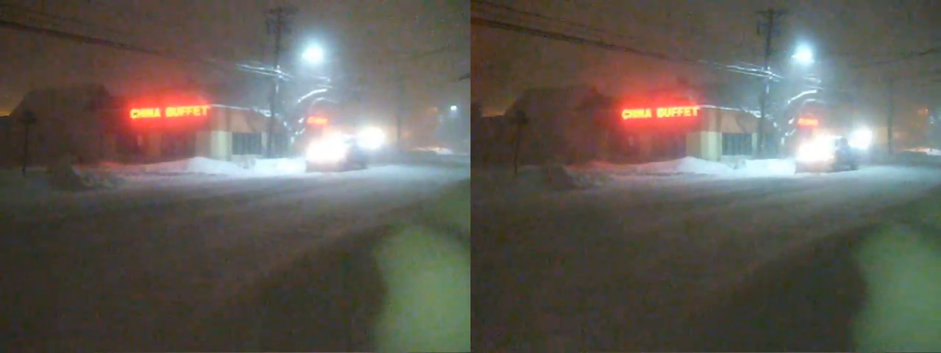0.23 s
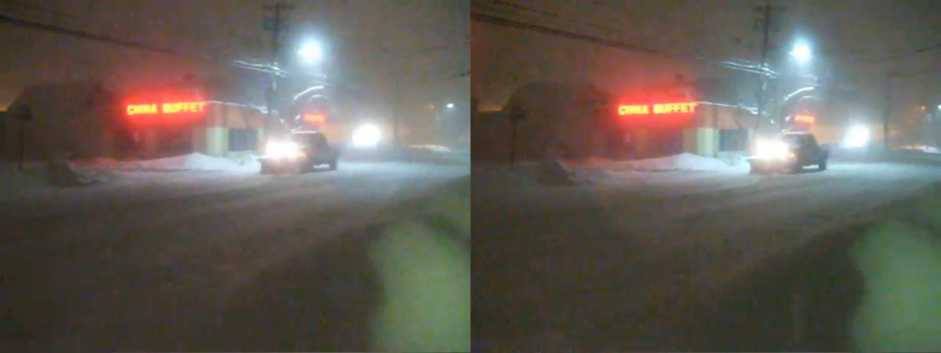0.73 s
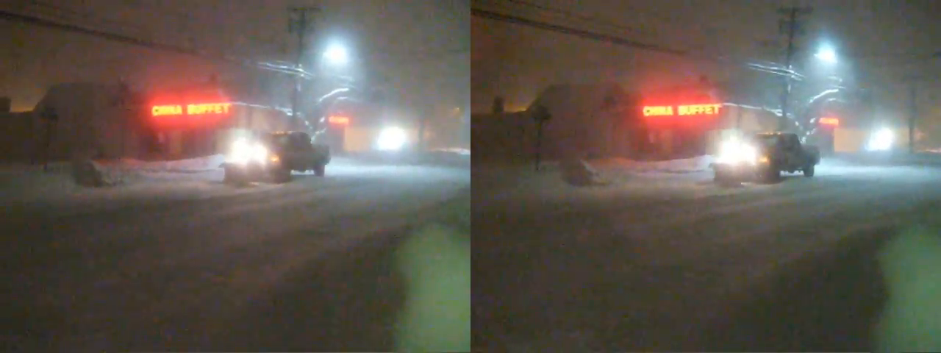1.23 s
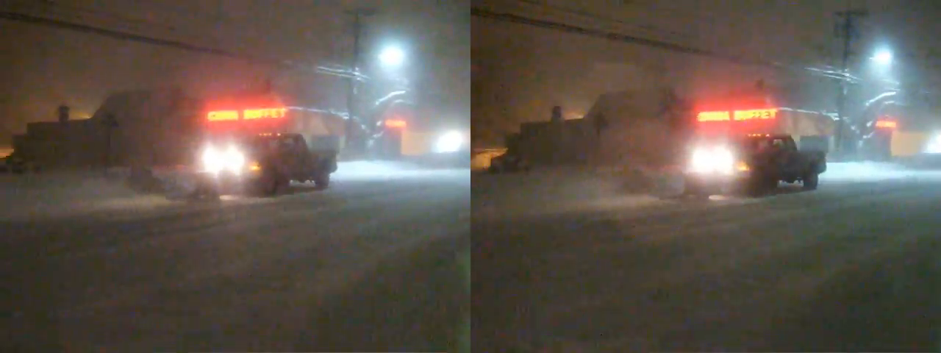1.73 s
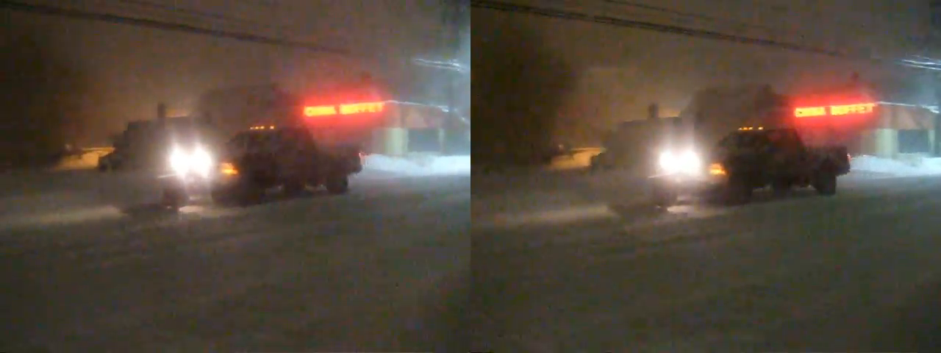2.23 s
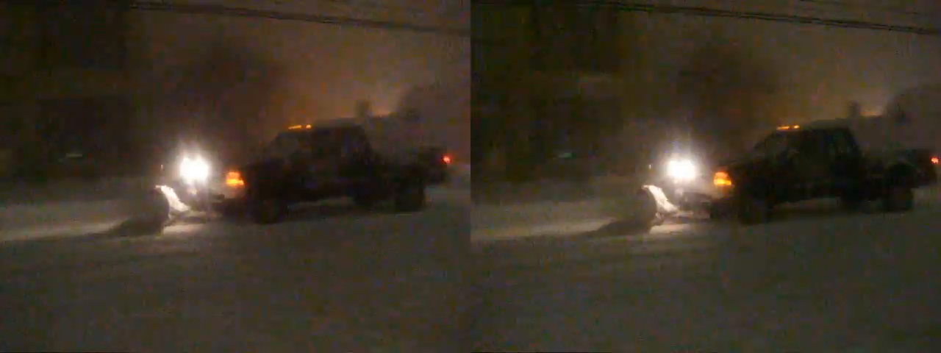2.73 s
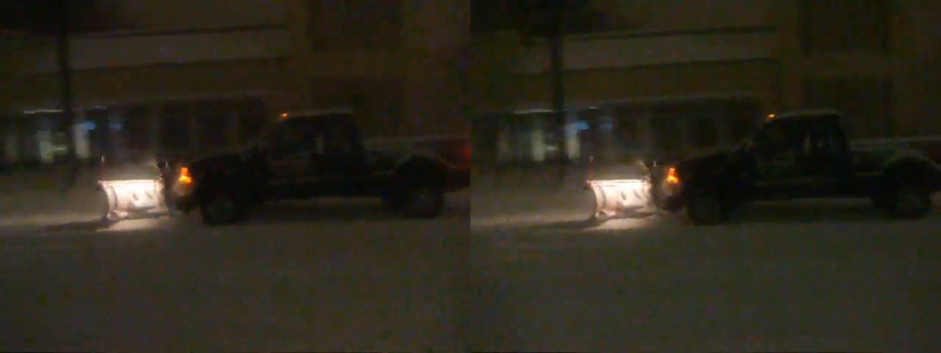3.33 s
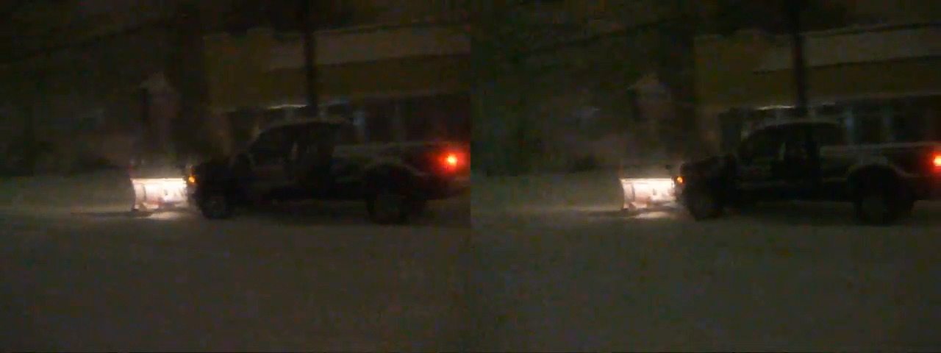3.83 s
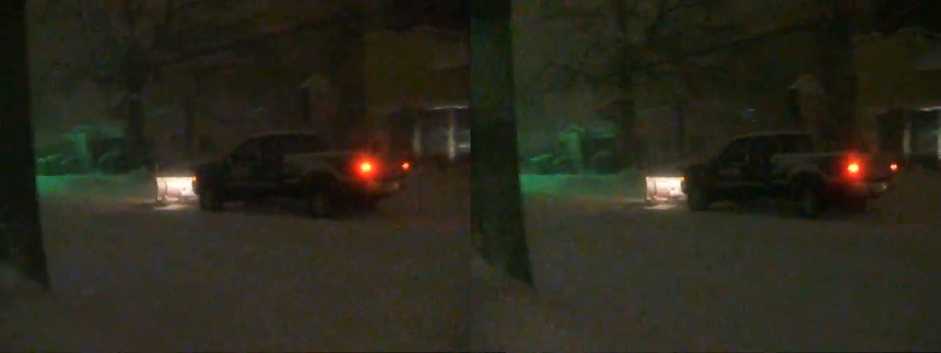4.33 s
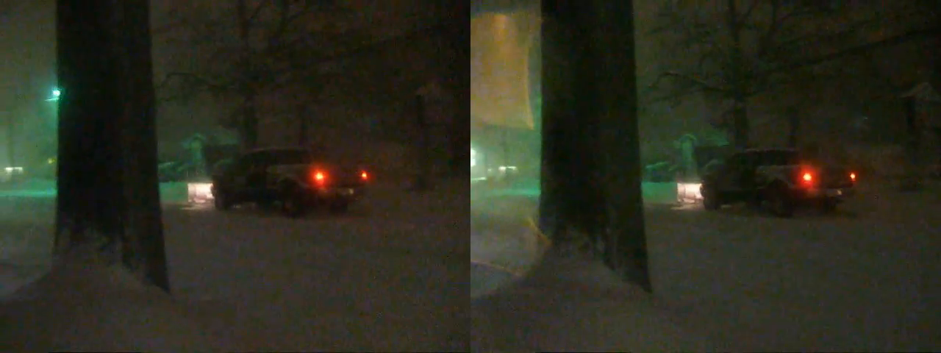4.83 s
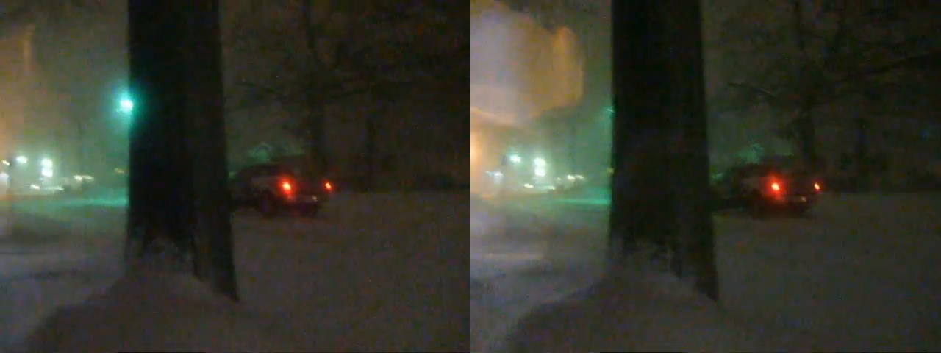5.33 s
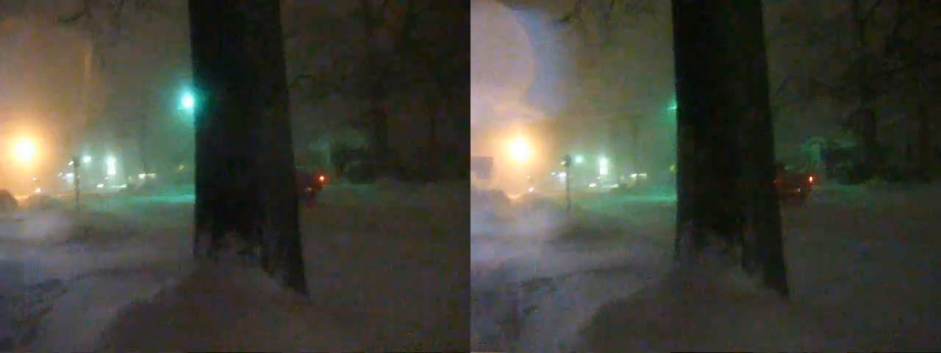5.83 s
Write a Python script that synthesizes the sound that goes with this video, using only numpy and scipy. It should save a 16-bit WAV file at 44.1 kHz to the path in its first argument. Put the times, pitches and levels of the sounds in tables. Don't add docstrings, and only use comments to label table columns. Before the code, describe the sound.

A handheld camera's two microphone ports catch soft storm hiss and sparse pellet ticks, then a passing truck's droning hum and broad rushing roar. Scattered wind slaps hit left and right separately, easing briefly near the pass; afterwards dense, loud, ragged gusts flap and crackle over the departing vehicle before dropping away at the end.

```python
import sys
import numpy as np
from scipy import signal
from scipy.io import wavfile
from scipy.ndimage import uniform_filter1d

SR = 44100
rng = np.random.default_rng(int(sys.argv[2]) if len(sys.argv) > 2 else 0)


def store_pcm(level_fs):
    pcm = np.round(np.clip(level_fs, -1, 1) * 32767).astype(np.int16)
    wavfile.write(sys.argv[1], SR, np.atleast_2d(pcm).T)


def elevation(decibels):
    levels = np.asarray(decibels, float)
    return 10 ** (levels / 20)


N = 267598


def evened(x):
    return x / np.sqrt(np.mean(x ** 2) + 1e-20)


def read(points, hz):
    point_hz, value = np.transpose(points)
    return np.interp(np.log(hz + 1), np.log(point_hz + 1), value)


def curves(rows, t):
    s, *columns = np.transpose(rows)
    return [np.interp(t, s, column) for column in columns]


def add(mix, s, sound):
    part = mix[..., round(s * SR):][..., :sound.shape[-1]]
    part += sound[..., :part.shape[-1]]


def wander(smooth_s):
    size = int(smooth_s * SR)
    once = uniform_filter1d(rng.standard_normal(N), size=size)
    return evened(uniform_filter1d(once, size=size))


def hiss(field_db, same, patchy_db):
    frames = field_db.shape[1]
    a, b, c, d, patches = rng.standard_normal((frames, 513, 5)).T
    patches = uniform_filter1d(patches, size=8, axis=0)
    patches = evened(uniform_filter1d(patches, size=12, axis=1))
    same = np.clip(same, -1, 1)
    left = a + 1j * b
    right = same * left + np.sqrt(1 - same ** 2) * (c + 1j * d)
    spectra = np.array([left, right]) * elevation(field_db + patchy_db * patches)
    return signal.istft(spectra, nperseg=1024, noverlap=768)[1][:, :N]


# pitch_hz [Hz], level_db [dB per Hz]
STREET_SPECTRUM = [(310, -31), (1450, 5.5), (3100, 2), (6100, -7), (10900, -25), (13600, -57)]


def street():
    hz = np.fft.rfftfreq(1024, 1 / SR)
    t = np.arange(N // 256 + 5) * 256 / SR
    rise_db_per_s = 1.6
    field_db = read(STREET_SPECTRUM, hz)[:, None] + rise_db_per_s * t
    return elevation(-45.5) * evened(hiss(field_db, same=0.11, patchy_db=-0.5))


# [dB, left minus right]
PELLETS = [(0.0485, -46, 8250, 0.0046, -16), (0.3187, -49, 7000, 0.011, 19),
           (0.5176, -42, 7520, 0.0057, -1), (0.6412, -42, 10700, 0.0084, 14),
           (1.063, -40.5, 7320, 0.021, 8), (1.1722, -43, 8350, 0.0061, 10), (1.2984, -39, 8410, 0.0056, 13),
           (1.39, -39.5, 7590, 0.0038, 18), (1.5314, -38, 7720, 0.0071, -1.0),
           (1.5628, -35, 7780, 0.044, -14.5), (1.6162, -45, 7280, 0.0048, 24),
           (1.7424, -41, 9500, 0.012, 13), (1.8166, -42, 7400, 0.0031, 22), (1.923, -39, 8350, 0.007, -14),
           (4.7054, -40, 7120, 0.007, 0.0), (4.7154, -46.5, 7170, 0.0081, 1.0),
           (5.2534, -46, 13300, 0.007, -3), (5.3844, -54, 13500, 0.007, 7),
           (5.5224, -56.5, 12000, 0.007, -2), (4.148, -55, 13000, 0.012, -1),
           (4.955, -53, 13000, 0.012, -5)]


def pellets():
    out, t = np.zeros((2, N)), np.arange(600) / SR
    band = signal.butter(2, [6000, 14000], "band", fs=SR)
    cracks = signal.lfilter(*band, rng.standard_normal((len(PELLETS), 600)))
    for (s, peak_db, hz, t60_s, pan_db), crack in zip(PELLETS, cracks):
        onset = 1 - np.exp(-t / 0.00022)
        ring = np.sin(2 * np.pi * hz * t) * elevation(-60 * t / t60_s) * onset
        tick = ring + 3.46 * crack * elevation(-60 * t / 0.003)
        pan = elevation(np.array([[pan_db], [-pan_db]]) / 2)
        add(out, s, elevation(peak_db) * pan * tick)
    return out


# peak_s [s], left_db [dB], right_db [dB], length_s [s]
GUSTS = [(0.895, 5.5, 5, 0.061), (1.344, 6.5, 9, 0.085), (1.43, 4, 4, 0.046), (1.6, 8.5, 7, 0.095),
         (2.056, 1.5, -2, 0.16), (3.19, 2, 1, 0.064), (3.582, 3.5, 4, 0.11), (3.712, -3, 9, 0.14),
         (4.103, 7, 9, 0.13), (4.482, 8, -3, 0.039), (4.878, 8, 4, 0.12), (5.038, 1, 4.5, 0.069),
         (5.22, 1.5, 2, 0.098), (5.378, 7.5, 1.5, 0.094), (5.552, 7.5, 4.5, 0.067)]


def gust_db():
    t, out = np.arange(N) / SR, np.zeros((2, N))
    for s, left_db, right_db, length_s in GUSTS:
        width_s = length_s * np.where(t < s, 0.51, 1)
        bell = np.exp(-2 * ((t - s) / width_s) ** 2)
        out += np.array([[left_db], [right_db]]) * bell
    return out


def eddy(half_ms):
    u = np.arange(-5 * half_ms, 5 * half_ms, 1000 / SR) / half_ms
    return (u ** 2 - 1) * np.exp(-u ** 2 / 2)


def eddies(level_db, small_ms, large_ms, per_s, clump_db, onset_db):
    out, clumps = np.zeros(N), elevation(clump_db * wander(0.015))
    for half_ms in np.geomspace(small_ms, large_ms, num=6):
        when, size, sign = rng.random((N, 3)).T
        strength = np.clip(size, .03, 1) ** -.35
        train = (when < per_s / SR) * strength * np.sign(sign - .4)
        out += half_ms ** -.1 * signal.oaconvolve(train * clumps, eddy(half_ms), "same")
    slow_rms = np.sqrt(uniform_filter1d(out ** 2, size=7000) + .2 * np.mean(out ** 2))
    alive = np.clip((level_db - onset_db) / 8 + .6, 0, 1)
    return out / slow_rms * elevation(level_db) * alive


# [dB, small eddies re large]
WIND = [(0, -35.5, 2, -7.5), (.35, -43.5, -2.5, -3.5), (.7, -40.5, -1, -12), (1.25, -39, 7.5, -8),
        (1.45, -33.5, 2, -9), (1.9, -34.5, -1.5, -5.5), (2.3, -34, 6.5, -12.5), (2.55, -30.5, 8, -9.5),
        (2.9, -42.5, -3.5, 9), (3.3, -38.5, 0.5, 13), (3.8, -32.5, 2.5, 2.5), (4.0, -23, -3.5, -6),
        (4.4, -20.5, -1.5, -8.5), (4.75, -24, 1, -4.5), (5.12, -20, 8.5, -3), (5.6, -23.5, -8.5, -4.5),
        (5.7, -32, 2.5, -6.5), (6.07, -38.5, -1, -1.5)]
# start_s [s], peak_db [dB], half_width_ms [ms], way [1 dip, -1 push]
SLAPS_LEFT = [(1.3138, -10, 1.03, 1), (1.3255, -16.8, 2.47, 1), (1.3485, -4.5, 2.6, 1),
              (1.4131, -19, 2.4, 1), (1.4339, -19.4, 4.5, -1), (1.5271, -18, 2.2, -1),
              (1.605, -17, 2.6, -1), (1.6181, -14, 2.8, -1), (2.025, -14, 3.2, -1), (2.0452, -17, 3.5, -1),
              (2.0559, -16, 2.9, -1), (2.0889, -15.9, 3.2, -1), (2.1049, -14, 3.02, 1),
              (2.1648, -20, 1.8, 1), (3.2217, -12.5, 2.1, -1), (3.5852, -9.5, 1.66, -1),
              (3.5989, -18, 1.1, 1), (3.6965, -7.5, 2.02, -1), (3.8314, -9.5, 1.5, 1),
              (4.0362, -8.5, 1.36, 1), (4.1107, -2.5, 1.18, 1), (4.1426, -3, 2.1, 1), (4.1723, -10, 1.5, 1),
              (4.4562, -7, 3.69, -1), (4.522, -11.0, 2.3, -1), (4.5792, -6.5, 1.86, 1),
              (4.8431, -9, 2.4, -1), (4.855, -3, 3.3, 1), (4.8699, -3, 1.75, 1), (4.8872, 0.5, 0.88, -1),
              (4.9034, -1.5, 3.69, -1), (4.9178, -7, 3.69, -1), (4.9512, -1, 2.06, -1),
              (4.9617, -6, 2.47, -1), (5.0329, -5, 1.9, -1), (5.0607, -9.6, 2.47, 1),
              (5.0937, -11, 3.69, -1), (5.1257, -17, 3.02, 1), (5.1454, -11, 2.47, -1),
              (5.1559, -4, 2.02, 1), (5.1649, -14.5, 5.5, -1), (5.1933, -7.5, 1.7, 1),
              (5.2157, -7, 2.8, -1), (5.2438, -7, 2.47, 1), (5.2533, -3, 1.63, 1), (5.2679, -1, 1.02, 1),
              (5.2847, -8, 1.8, -1), (5.299, -6, 3.5, 1), (5.3555, -2.5, 3.8, 1), (5.5597, -7, 1.95, 1)]
# start_s [s], peak_db [dB], half_width_ms [ms], way [1 dip, -1 push]
SLAPS_RIGHT = [(1.3447, -10, 2.3, 1), (1.5603, -18.1, 1.5, -1), (1.5731, -17.6, 1.8, -1),
               (1.6065, -16.5, 3.02, -1), (1.6449, -13.0, 2.6, 1), (1.7944, -26, 3.02, -1),
               (2.0198, -16, 3.3, 1), (2.0335, -19.6, 5.2, -1), (3.2047, -6.5, 1.2, 1),
               (3.2862, -12.5, 0.93, 1), (3.586, -9.1, 1.66, -1), (3.6038, -5.5, 1.13, 1),
               (3.6692, -9, 0.53, 1), (3.7235, -10, 1.9, 1), (3.7361, -14, 1.3, 1),
               (3.7542, -4.5, 1.53, -1), (4.0244, -9, 1.3, 1), (4.0347, -6.5, 1.36, 1),
               (4.0796, -11, 1.5, -1), (4.0882, -8, 0.99, 1), (4.098, -7, 1.1, 1), (4.1113, -11.3, 3.7, -1),
               (4.231, -10.6, 1.47, 1), (4.2416, -2, 2.9, -1), (4.3548, -6, 2, 1), (4.4831, -14, 2.4, 1),
               (4.508, -14.5, 3, -1), (4.5276, -11, 2.2, 1), (4.676, -11, 2.3, 1), (4.713, -15, 4.7, -1),
               (4.7427, -9, 2.3, -1), (4.7724, -6, 1.4, 1), (4.8378, -3.5, 1.5, 1), (4.8465, -13, 3.5, 1),
               (4.8935, -7, 3.1, -1), (4.9484, -6, 4.8, -1), (5.0155, -4.5, 2.5, 1), (5.037, -5.5, 2.5, 1),
               (5.093, -7, 2.2, 1), (5.227, -10.3, 2.02, -1), (5.2829, -5.5, 4, -1), (5.3107, -7, 3.3, 1),
               (5.35, -12.1, 4.9, 1), (5.381, -8, 1.75, 1), (5.428, -3.5, 3.1, 1), (5.54, -9.0, 3.7, 1),
               (5.5698, -6, 1.9, 1), (5.5802, -9.3, 2, 1), (5.621, -10.5, 1.2, 1), (5.7732, -16.5, 1.6, 1)]
# start_s [s], peak_db [dB], half_width_ms [ms], port [0 left, 1 right]
SNAPS = [(3.669, -22, .25, 1), (4.089, -22, .3, 1), (4.0975, -5.5, 0.25, 1), (4.1107, -20, .35, 0),
         (4.887, -21, 0.42, 0), (5.2525, -16.5, .25, 0), (5.381, -26, .3, 1), (5.578, -22, 0.42, 1),
         (1.3135, -28, .4, 0), (4.245, -12, 0.66, 1), (4.3, -13, .4, 0), (5.33, -22, .3, 0),
         (5.372, -18, 0.41, 1), (6.1, -19, 0.44, 0), (4.123, -17, 0.45, 1), (4.155, -17, 0.73, 1),
         (3.4, -15, .5, 1), (5.572, -13, 0.67, 1), (5.6, -17, 0.66, 1), (5.218, -13, .7, 1),
         (3.61, -21, .5, 1)]


def wind():
    strength_db, lean_db, fine_db = curves(WIND, np.arange(N) / SR)
    extra_db, out = gust_db(), np.zeros((2, N))
    for port, slaps in enumerate((SLAPS_LEFT, SLAPS_RIGHT)):
        steady_db = strength_db + lean_db * (.5 - port)
        large_db = steady_db + .7 * extra_db[port] + 2.0
        small_db = steady_db + fine_db + 1.2 * extra_db[port] + 3.2
        tear_db = steady_db + fine_db - 18 + 2.4 * extra_db[port]
        out[port] += eddies(large_db, 2.4, 8.5, per_s=30, clump_db=3, onset_db=-38)
        out[port] += eddies(small_db, .85, 2.6, per_s=55, clump_db=3.5, onset_db=-40)
        out[port] += eddies(tear_db, .36, .75, per_s=70, clump_db=4, onset_db=-44)
        for s, peak_db, half_ms, way in slaps:
            slap = np.sign(way) * elevation(peak_db + 1.5) * eddy(half_ms)
            add(out[port], s - 5 * half_ms / 1000, slap)
    for s, peak_db, half_ms, port in SNAPS:
        add(out[int(port > .5)], s - 5 * half_ms / 1000, elevation(peak_db) * eddy(half_ms))
    return out


# start_s [s], level_db [dB], nearness [0-1]
TRUCK = [(0, -41, 0.05), (.5, -38.5, 0.07), (1, -36.5, 0.1), (1.5, -35, 0.09), (2, -32, 0.06),
         (2.5, -28, 0.42), (3, -25.5, 0.6), (3.4, -25, 0.33), (3.75, -27, 0.5), (4.08, -27.5, 0.56),
         (4.2, -27.5, 0.57), (4.5, -28, 0.66), (4.85, -29.5, 0.65), (5.2, -33, 0.9), (5.6, -36, 0.63),
         (6.07, -40, 0.34)]
# order [multiple of firing rate], far_db [dB re roar], near_db [dB re roar]
WHINES = [(12.74, -19, -16.5), (17.08, -12, -30), (24.3, -43, -40), (27.35, -29, -34)]


def whine(cycle):
    level_db, near = curves(TRUCK, np.arange(N) / SR)
    out = np.zeros(N)
    for order, far_db, near_db in WHINES:
        phase = 2 * np.pi * 8 * order * cycle + .9 * wander(.025)
        line_db = far_db + (near_db - far_db) * near + 2.2 * wander(0.035)
        out += elevation(line_db) * np.sin(phase)
    return np.sqrt(2) * elevation(level_db) * out


# pitch_hz [Hz], level_db [dB per Hz]
NEAR_SPECTRUM = [(31, -1.5), (132, 0.5), (355, -11.5), (605, -8.5), (835, -15), (1200, -2.5), (1325, -8),
                 (1640, -1.5), (1900, -5), (2235, -3.5), (2700, -4), (3060, -13.5), (9500, -32),
                 (13500, -45)]
# pitch_hz [Hz], change_db [dB]
FAR_COLOUR = [(31, -2), (205, 2), (605, 7), (1090, 3.5), (1260, -0.5), (2450, -5), (4100, -1.3),
              (10100, -4)]
# pitch_hz [Hz], likeness [0-1]
LIKENESS = [(61, 0.94), (310, 1), (1410, 0.98), (3050, 0.94), (6600, 0.82), (12100, 0.16)]
# pitch_hz [Hz], width_hz [Hz], level_db [dB]
HOLLOWS = [(1000, 93, -1.5), (1187, 62, 3.5), (1345, 56, -5.5), (1580, 53, 0.5), (1787, 93, -3.5),
           (2820, 124, -3)]
# start_s [s], spread [0 same at both, 1 as in LIKENESS, more is
SPREAD = [(0, 2.4), (1.6, 1.4), (2.0, 0.14), (3.5, 0.33), (3.65, 1.3), (4.8, 1.2), (6.07, 0.42)]


def roar(cycle):
    hz = np.fft.rfftfreq(1024, 1 / SR)
    t = np.arange(N // 256 + 5) * 256 / SR
    level_db, near = curves(TRUCK, t)
    colour_db = read(NEAR_SPECTRUM, hz)[:, None] + read(FAR_COLOUR, hz)[:, None] * (1 - near)
    field_db = colour_db + level_db - 10
    for centre_hz, width_hz, db in HOLLOWS:
        field_db += db * np.exp(-((hz[:, None] - centre_hz) / width_hz) ** 2)
    spread = np.maximum(curves(SPREAD, t)[0], 0)
    same = 1 - (1 - read(LIKENESS, hz)[:, None]) * spread
    throb_db = 0.5 * np.cos(2 * np.pi * cycle) + 0.54 * np.cos(4 * np.pi * cycle + 1)
    return hiss(field_db, same, patchy_db=0.99) * elevation(throb_db)


# [dB, hum]
ENGINE = [(0, 94.4, -39), (.92, 92.1, -37.5), (1.81, 90.8, -33.5), (2.21, 93.6, -33), (2.58, 98.1, -25.5),
          (3.16, 97.6, -23.5), (3.51, 96.1, -29), (3.91, 93.7, -29), (4.61, 93.5, -24.5),
          (5.21, 93.4, -28.5), (5.71, 93.2, -30), (6.07, 93.1, -33.5)]
# order [multiple of firing rate], level_db [dB re hum]
ORDERS = [
    (.5, -12),
    (1, 0),
    (1.5, -18),
    (2, -18),
]


def engine():
    hz, hum_db = curves(ENGINE, np.arange(N) / SR)
    turns = np.cumsum(hz * (1 + 0.00417 * wander(0.062))) / SR
    hum = np.zeros(N)
    for order, db in ORDERS:
        hum += elevation(db + 1.04 * wander(0.06)) * np.sin(2 * np.pi * order * turns)
    return np.sqrt(2) * elevation(hum_db) * hum, turns / 8


def scene():
    hum, cycle = engine()
    hum_at_ports = hum * elevation(np.array([[.2], [-.2]]))
    truck = hum_at_ports + roar(cycle) + whine(cycle)
    return street() + pellets() + wind() + truck


def roll_off(x):
    return signal.sosfilt(signal.butter(12, 14670, fs=SR, output="sos"), x)


def record(dry):
    peak_db = 20 * np.log10(abs(dry).max(0) + 1e-9)
    recovery_db = np.arange(N) * 8 / SR
    held_db = np.maximum.accumulate(peak_db + recovery_db) - recovery_db
    over_db = np.maximum(held_db + 4.5, 0)
    ducked = dry / elevation(0.84 * uniform_filter1d(over_db, size=300))
    return roll_off(ducked)


dry = scene()
out = record(dry)
store_pcm(out)
```